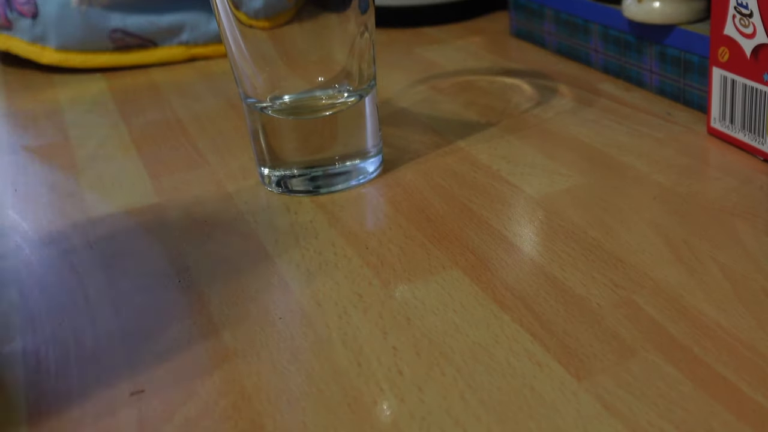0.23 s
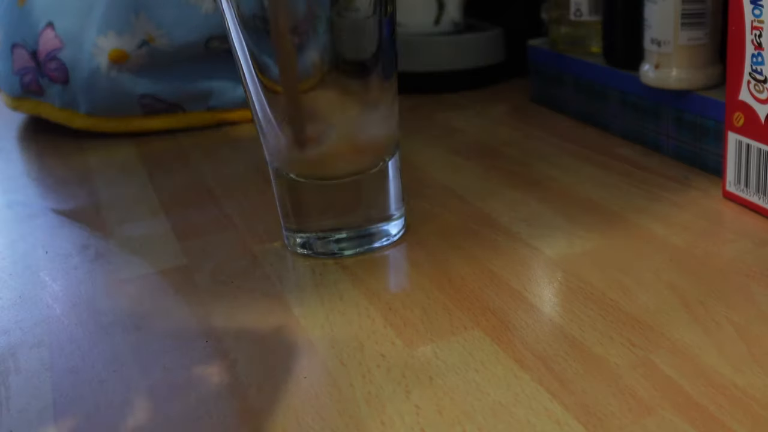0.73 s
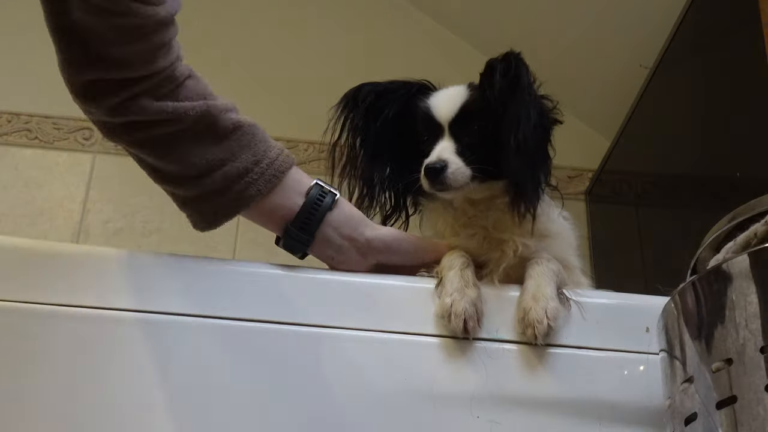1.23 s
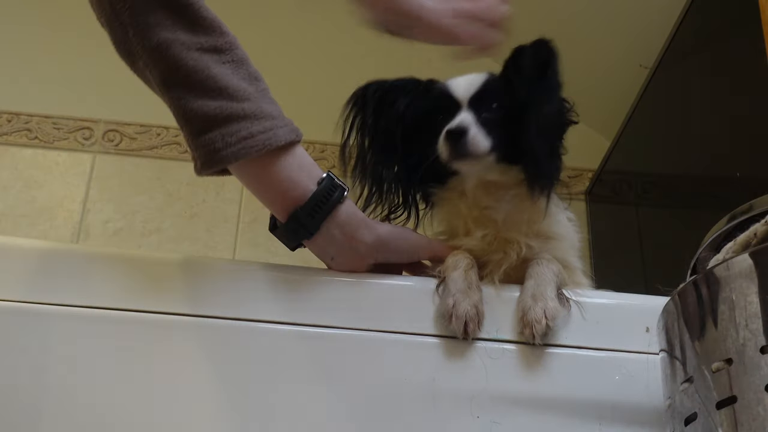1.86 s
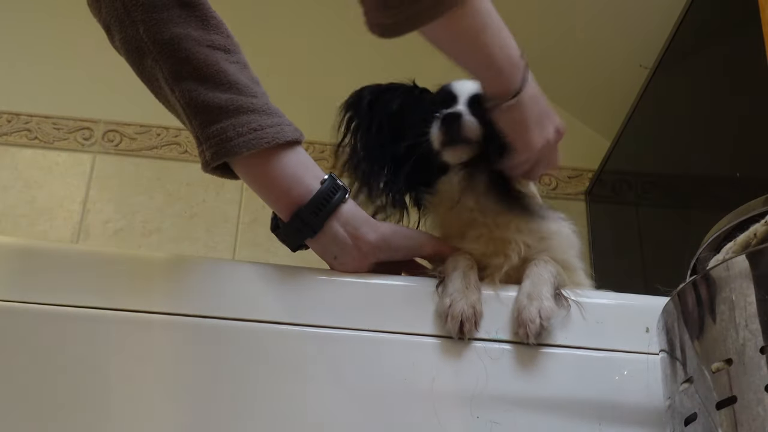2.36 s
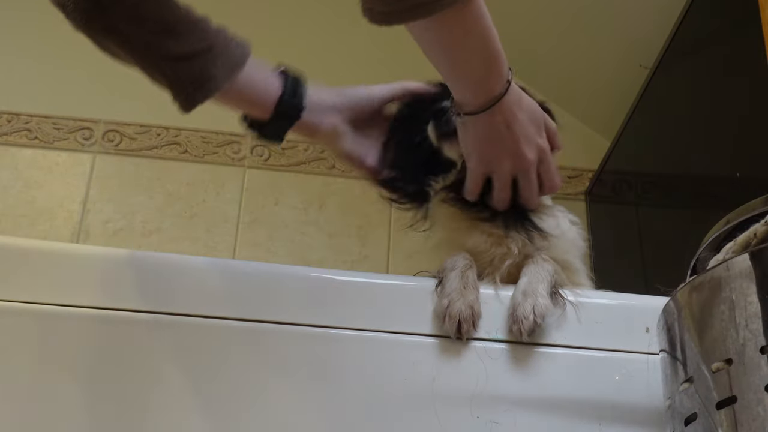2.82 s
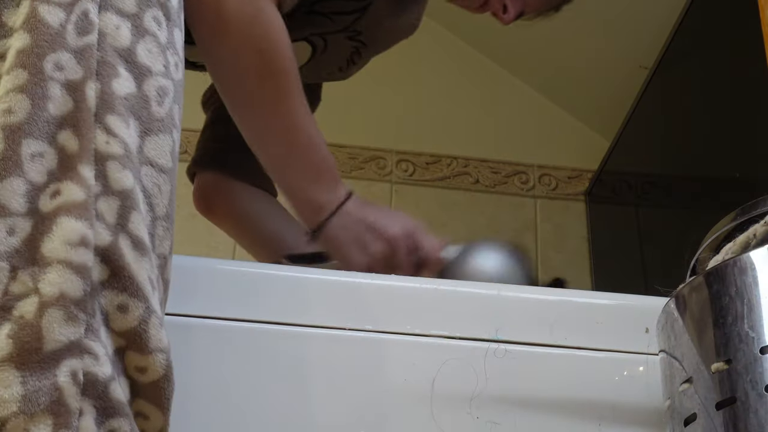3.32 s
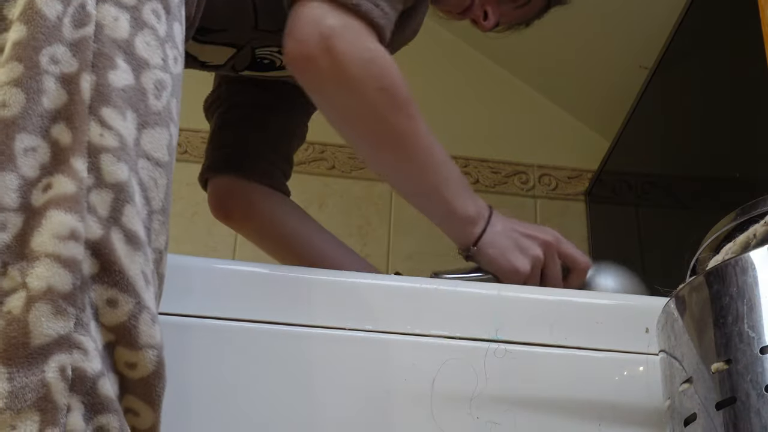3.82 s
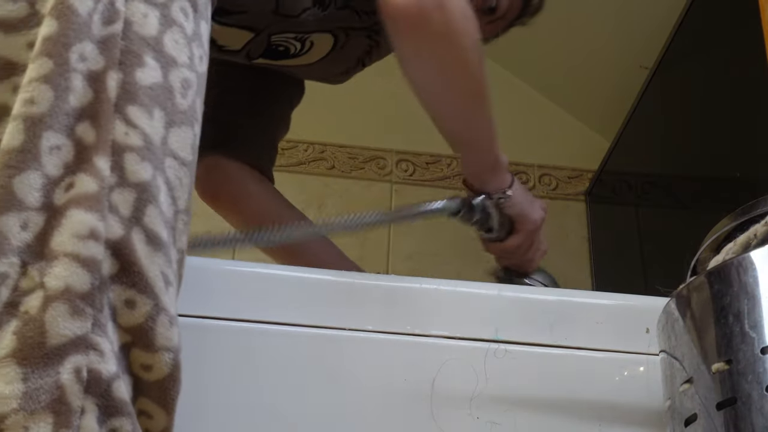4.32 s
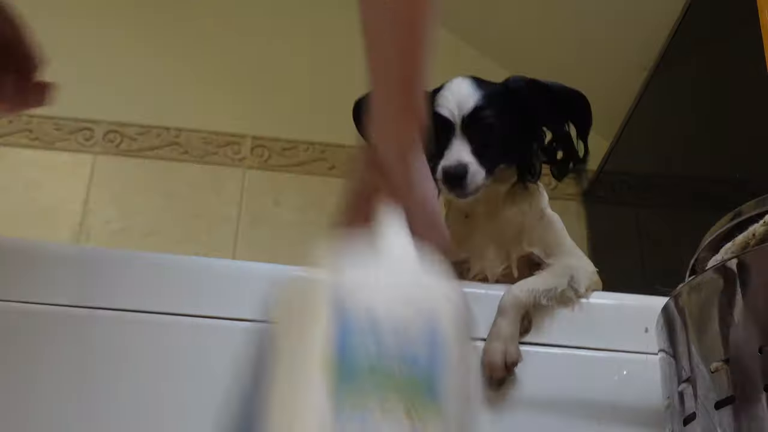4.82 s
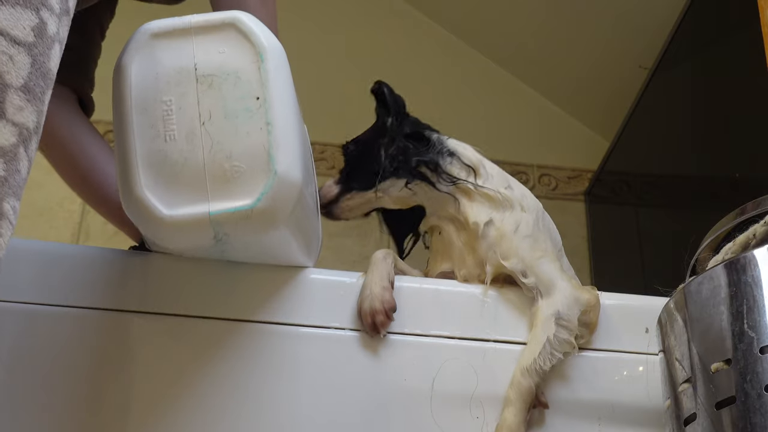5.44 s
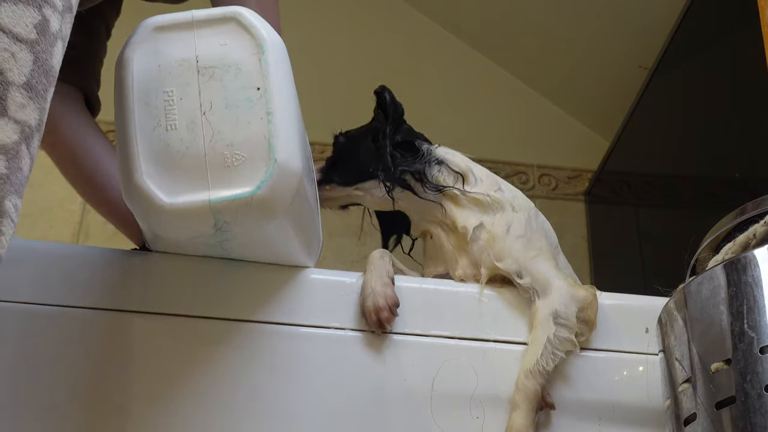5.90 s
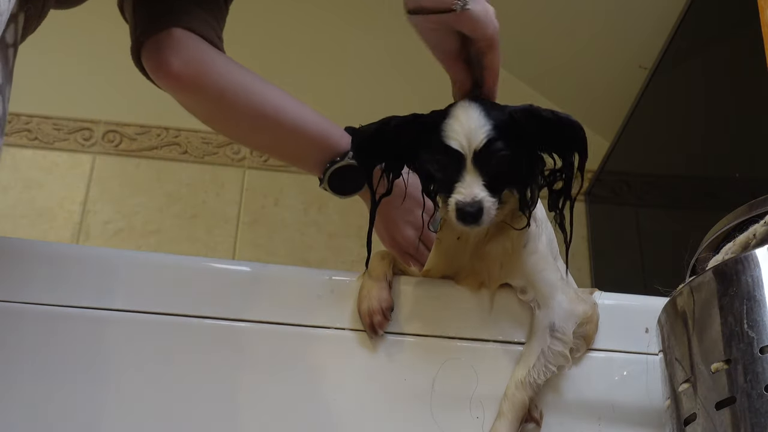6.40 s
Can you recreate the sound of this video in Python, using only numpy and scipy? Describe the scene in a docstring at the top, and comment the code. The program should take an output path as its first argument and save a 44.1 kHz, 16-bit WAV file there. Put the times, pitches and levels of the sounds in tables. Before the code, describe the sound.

In a humming kitchen, a carton is set down on a counter with a clattering knock, and milk briefly splashes into a glass. The sound cuts to a bathroom, where a nearby shower head hisses steadily into a bathtub. The spray turns uneven, with light bumps, splashes and sharp slaps of water on enamel. A heavy jug thuds against the tub, the water stops, and a low hum remains.

```python
"""A shower head sprays into a bathtub: fine jets hiss and the puddle bubbles where they land.
Before it, in a kitchen, a carton knocks down on the counter and milk fizzes and splashes into a glass.
Then the shower runs and sweeps over wet fur; head, hose and a full jug bump the tub, and water slaps
the enamel three times. The spray stops, leaving faint rustles, faint ringing and the bathroom's hum."""
import sys
import numpy as np
from scipy import signal
from scipy.fft import rfft, irfft, next_fast_len
from scipy.io import wavfile
from scipy.ndimage import uniform_filter1d, map_coordinates

SR = 44100
rng = np.random.default_rng(int(sys.argv[2]) if len(sys.argv) > 2 else 0)


def store_pcm(level_fs):
    """Save levels as 16-bit WAV."""
    pcm = np.round(np.clip(level_fs, -1, 1) * 32767).astype(np.int16)
    wavfile.write(sys.argv[1], SR, np.atleast_2d(pcm).T)


N = 294040
TIME = np.arange(N) / SR
CHANGE_S = 3.19  # with a click, the hum and spray change tone abruptly


def amp(db):
    """Turns decibels into a gain."""
    return 10 ** (np.asarray(db) / 20)


def unit(x):
    """Scales x to an average (rms) level of 1."""
    return x / np.sqrt(np.mean(x ** 2) + 1e-20)


def add(out, start_s, x):
    """Mixes x into out from start_s on."""
    part = out[round(start_s * SR):][:len(x)]
    part += x[:len(part)]


def curves(rows):
    """Levels in dB that glide from row to row, silent outside the table."""
    times, *columns = np.transpose(rows)
    return [np.interp(TIME, times, column, left=-150, right=-150) for column in columns]


def steps(rows):
    """Levels in dB that hold from each row's start to its end, silent elsewhere."""
    out = np.full((len(rows[0]) - 2, N), -150.)
    for start_s, end_s, *levels in rows:
        out[:, round(start_s * SR):round(end_s * SR)] = np.array(levels)[:, None]
    return out


def wobble(rate):
    """A smooth curve through `rate` random values a second."""
    return map_coordinates(rng.standard_normal(int(N * rate / SR) + 4), [TIME * rate])


def filtered(x, response):
    """Shapes x with a filter: a function that gives the gain at each frequency."""
    size = next_fast_len(len(x) + SR // 2)
    return irfft(rfft(x, size) * response(np.fft.rfftfreq(size, 1 / SR)), size)[:len(x)]


def colour(points):
    """A filter drawn through (pitch_hz, level_db) points."""
    pitch_hz, level_db = np.transpose(points)
    return lambda f: amp(np.interp(np.log(f + 1), np.log(pitch_hz + 1), level_db))


def body(modes):
    """A filter that rings like an object, at each (pitch_hz, width_hz, level_db)."""
    return lambda f: sum((-1) ** k * amp(db) * 1j * f * width / (hz * hz - f * f + 1j * f * width)
                         for k, (hz, width, db) in enumerate(modes))


def rush(response, patchy_db, grain_db=0):
    """Filtered noise at level 1, with louder and softer patches; grain_db makes it crackle."""
    noise = rng.standard_normal(N + 512) * amp(grain_db * rng.standard_normal(N + 512))
    spectrum = signal.stft(noise, nperseg=512)[2]
    patches = uniform_filter1d(rng.standard_normal(spectrum.shape), size=7, axis=0)
    patches = unit(uniform_filter1d(patches, size=6, axis=1))
    patchy = signal.istft(spectrum * amp(patchy_db * patches), nperseg=512)[1][:N]
    return unit(filtered(patchy, response))


def bubbles(count, hz, spread, cycles):
    """Scattered bubbles at level 1: each is a short tone that rises in pitch as it dies."""
    when, size, pitch = rng.random(count), rng.exponential(size=count), rng.standard_normal(count)
    turns = np.clip(hz * np.exp(spread * pitch), 800, 9000)[:, None] * TIME[:SR // 40]
    age = turns / cycles
    ring = amp(1.6 * size)[:, None] * age * np.exp(-3 * age) * np.sin(2 * np.pi * turns * (1 + .05 * age))
    where = (when * N).astype(int)[:, None] + np.arange(SR // 40)
    return unit(np.bincount(where.ravel(), ring.ravel())[:N])


# How loud the kitchen is: start_s, end_s, hum_db, air_db
KITCHEN_LEVELS = [(0, 0.067, -38, -50), (.07, .73, -38.5, -46.5), (.745, 1.27, -36, -45)]
# Tone of its hum and of its air: pitch_hz, level_db
KITCHEN_HUM = [(15, -43), (25, -12), (102, -4.5), (130, 2), (181, -5.5), (334, -1), (461, -7), (537, -21),
               (700, -34), (1000, -80)]
KITCHEN_AIR = [(620, -13), (850, 0.5), (1800, -4), (2070, -8), (4460, -11.5), (16000, -25.5)]
# Where its air sings faintly: pitch_hz, width_hz, level_db
KITCHEN_RINGS = [(1780, 60, -2), (2400, 60, -6), (2650, 65, -4), (4505, 80, -7), (5380, 70, -6),
                 (9440, 60, -11)]


def kitchen():
    """The kitchen hums low under a faint hiss of air."""
    hum_db, air_db = steps(KITCHEN_LEVELS)
    air = rush(colour(KITCHEN_AIR), patchy_db=1)
    singing = amp(-9 + 2.5 * wobble(8)) * rush(lambda f: body(KITCHEN_RINGS)(f) ** 2, patchy_db=4)
    return amp(hum_db) * rush(colour(KITCHEN_HUM), patchy_db=.6) + amp(air_db) * unit(air + singing)


# The carton touches the counter: start_s, knock_db, tick_db
CARTON_CONTACTS = [(0.4267, 11.5, -21), (0.448, 4, -48), (0.4627, 13, -17), (0.48, -6, -40),
                   (0.497, 2.5, -44), (0.512, 9.5, -24), (0.5406, 14.5, -16.5), (0.56, 12, -26),
                   (.58, 7, -39)]
# How the counter rings: pitch_hz, width_hz, level_db
COUNTER_RINGS = [(73.6, 58, -12), (163, 34, -1), (199, 52, -2.5), (352, 38, 1), (418, 35.6, 4.5),
                 (540, 46, -4), (886, 200, -16)]
# Tone of scraping card: pitch_hz, level_db
CARD_TONE = [(350, -35), (600, -19), (1210, 0), (1930, -12), (3250, -11), (14900, -27.5), (16000, -19)]


def carton():
    """Each contact pushes the counter softly and ticks; the card scrapes as it settles."""
    pushes, ticks, t = np.zeros(N), np.zeros(N), TIME[:SR // 20]
    for start_s, knock_db, tick_db in CARTON_CONTACTS:
        add(pushes, start_s, amp(knock_db) * np.hanning(40))
        tick_shape = amp(tick_db - 60 * np.maximum(t - .0035, 0) / .008)
        add(ticks, start_s, tick_shape * rng.standard_normal(len(t)))
    ticks = filtered(ticks, lambda f: 1j * f / (900 + 1j * f) * 2500 / (2500 + 1j * f))
    before_s, after_s = np.maximum(.466 - TIME, 0), np.maximum(TIME - .584, 0)
    slide = amp(-31 - 260 * before_s - 290 * after_s)  # swells, holds, fades
    rumble = amp(9) * slide * rush(body(COUNTER_RINGS), patchy_db=5)
    scrape = slide * rush(colour(CARD_TONE), patchy_db=1.5, grain_db=3.5)
    echo = amp(-60 * TIME[:SR // 2] / .31) * rng.standard_normal(SR // 2)  # off cupboards and walls
    pushes += amp(-2) * signal.fftconvolve(pushes, echo / np.linalg.norm(echo))[:N]
    return filtered(pushes, body(COUNTER_RINGS)) + ticks + rumble + scrape


# Tone of pouring milk: pitch_hz, level_db
MILK_TONE = [(410, -32), (700, -6), (1200, -11), (4670, -12), (5400, -14), (16000, -35)]


def milk(start_s=.94, end_s=1.27, rise_db_per_s=74):
    """The stream of milk swells and fizzes with small bubbles."""
    level_db = -31.5 - rise_db_per_s * (end_s - TIME) + 1.7 * wobble(59.4)
    stream = amp(level_db) * rush(colour(MILK_TONE), patchy_db=7)
    fizz = amp(-46) * bubbles(count=2500, hz=1072, spread=.133, cycles=28)
    return (TIME > start_s) * (TIME < end_s) * (stream + fizz)


# Splashes of milk, then water: start_s, level_db, pitch_hz, fade_s (time to fall 60 dB)
SPLASHES = [(0.9522, -19, 8000, 0.015), (1.0157, -22.5, 6400, 0.095), (1.0835, -28, 7500, 0.029),
            (1.09, -26, 11900, 0.12), (1.122, -24, 9760, 0.14), (1.164, -25, 5441, 0.3),
            (1.1655, -21, 3620, 0.046), (1.252, -23.5, 3180, 0.069), (3.323, -17.5, 5500, 0.074),
            (3.474, -19.5, 5550, 0.25), (3.722, -17, 12000, 0.12), (3.76, -33, 1643, 0.57),
            (3.836, -16, 7280, 0.05), (3.914, -24, 5400, 0.1), (3.942, -15, 3800, 0.045),
            (3.950, -11, 4200, 0.043), (4.09, -19, 12500, 0.069), (4.125, -28, 900, 0.18),
            (4.13, -29.5, 1540, 0.83), (4.136, -30, 1950, 0.21), (4.186, -23.5, 1060, 0.38),
            (4.198, -23.5, 1370, 0.4), (4.242, -16.5, 2260, 0.15), (3.865, -31.5, 917, .25),
            (4.298, -25.5, 904, 0.27), (4.419, -21, 1260, 0.12), (4.606, -17.5, 10300, 0.16)]


def splashes():
    """Each splash is a burst of noise ringing in the pocket of air that it opens."""
    out, t = np.zeros(N), TIME[:SR // 6]
    for start_s, db, hz, fade_s in SPLASHES:
        # Width as a share of the pitch: long splashes ring purer, high ones noisier.
        width = .38 * (fade_s / .05) ** -.45 * (hz / 2500) ** .3
        shape = amp(-60 * t / fade_s) + .45 * np.exp(-t / .0008)
        burst = shape * rng.standard_normal(len(t))
        burst *= amp(5 * rng.standard_normal(len(t)))  # single droplets stand out
        pocket = body([(hz, width * hz, 0)])
        ring = filtered(burst, lambda f: pocket(f) ** 2 + .1 * width * (1j * f / (hz + 1j * f)) ** 3)
        add(out, start_s, amp(db) * ring / np.max(np.abs(ring)))
    return out


# How loud the bathroom is: start_s, end_s, hum_db, air_db
BATH_LEVELS = [(1.29, 3.19, -39.5, -76), (3.19, 5.19, -37.5, -55.5), (5.19, 5.98, -38.5, -62),
               (5.98, 6.68, -36, -60.5)]
# Tone of its hum before and after the click at CHANGE_S, and of its air: pitch_hz, level_db
EARLY_HUM = [(25, -33), (141, -0.5), (176, -7), (205, 2), (257, -10), (344, -10.5), (430, -19),
             (700, -34.5), (1100, -79)]
LATE_HUM = [(36, -50), (64, -21.5), (100, -11), (141, 1), (176, -11), (224, -2.5), (307, -19), (352, -14.5),
            (600, -41), (850, -85.5)]
BATH_AIR = [(290, -27.5), (480, -8.5), (700, -9.5), (919, -9.5), (2430, -16), (14000, -12), (16000, -11)]
# Where its air sings faintly: pitch_hz, width_hz, level_db
BATH_RINGS = [(1240, 59, -4), (2050, 82, -1.5), (3540, 120, -2.5)]


def bathroom():
    """The bathroom hums quietly under a faint hiss of air."""
    hum_db, air_db = steps(BATH_LEVELS)
    late, early = rush(colour(LATE_HUM), patchy_db=.83), rush(colour(EARLY_HUM), patchy_db=.1)
    hum = np.where(TIME > CHANGE_S, late, early)
    air = rush(lambda f: colour(BATH_AIR)(f) * (1 + 1.8 * abs(body(BATH_RINGS)(f)) ** 2), patchy_db=1)
    return amp(hum_db + .52 * wobble(8.2)) * hum + amp(air_db) * air


# Strength of the spray as the head turns: time_s, jets_db, fine_db (boost of the highest hiss)
SPRAY_LEVELS = [(1.29, -25.5, 0), (3.17, -25, -4), (3.21, -30.5, 4.5), (3.246, -35, 7), (3.265, -27.5, -5),
                (3.305, -35, 1), (3.36, -29, -1.5), (3.46, -28, -1.5), (3.54, -25, -1), (3.71, -29.5, -1),
                (3.79, -32, -4), (3.83, -37, 3), (3.92, -34.5, -3), (4.09, -56, 7), (4.13, -30, -5),
                (4.35, -30.5, -5), (4.58, -37, -4.5), (4.7, -52, 6), (4.95, -70, -38)]
# Tone of the jets and of the puddle where they land: pitch_hz, level_db
JETS_TONE = [(1180, -40.5), (2000, -12.5), (2320, -5), (3230, -1), (9580, -4), (16000, -8)]
PUDDLE_TONE = [(600, -63), (759, -13), (955, -12), (1200, -2.5), (2020, -1.5), (3000, -9.5), (4200, -63)]
# The puddle wells up or drains: middle_s, half_length_s, change_db
GURGLES = [(1.7, 0.016, 3), (1.972, 0.026, 3.5), (2.2, .025, 3.5), (3.84, .09, -3), (4.27, 0.047, 6.5),
           (4.778, 0.046, 10.5)]


def shower(fine_above_hz=7600):
    """Fine jets hiss and the puddle bubbles; the hiss is patchier while the head moves."""
    jets_db, fine_db = curves(SPRAY_LEVELS)
    late = TIME > CHANGE_S
    flutter_db = .704 * wobble(45)
    still = rush(colour(JETS_TONE), patchy_db=1.33)
    moving = rush(colour(JETS_TONE), patchy_db=1.9, grain_db=2.5)
    fine = filtered(moving, lambda f: 1 / (1 + (fine_above_hz / (f + 1)) ** 6))
    jets = amp(jets_db + flutter_db) * np.where(late, moving + (amp(fine_db) - 1) * fine, still)
    gurgle_db = sum(db * np.exp(-((TIME - middle_s) / half_s) ** 2) for middle_s, half_s, db in GURGLES)
    puddle_db = jets_db + np.where(late, -8.5, -6) + gurgle_db
    puddle = rush(colour(PUDDLE_TONE), patchy_db=1.4, grain_db=1)
    puddle += amp(-4) * bubbles(count=5000, hz=2000, spread=.3, cycles=30)
    # Nearer the enamel, a strong stream drums lower.
    drumming = late * amp(1.16 * jets_db + 27) * rush(body([(730, 470, 0)]), patchy_db=.6)
    return jets + amp(puddle_db + flutter_db + .6 * wobble(13)) * (puddle + drumming)


# Head, hose and jug touch the tub, the heavy jug with the dullest thud: start_s, level_db, dull_above_hz
BUMPS = [(3.252, -13.5, 1500), (3.388, -14, 1500), (4.603, 4.5, 200), (4.626, 0, 200)]
# How the tub rings: pitch_hz, width_hz, level_db
TUB_RINGS = [(72, 25, -1.5), (160.4, 17, -1.5), (208.4, 44, -2.5), (257.4, 72, -2), (409, 55, 3.5),
             (500, 99, -3), (908, 290, -8)]


def tub_bumps(push_db=-5):
    """A wet contact pushes the tub once and shakes it for a moment."""
    shake, t = np.zeros(N), TIME[:SR // 2]
    for start_s, db, dull_above_hz in BUMPS:
        force = amp(db - 60 * t / .17) * (1 - np.exp(-t / .002)) * rng.standard_normal(len(t))
        add(force, 0, amp(db + push_db) * np.hanning(110))
        add(shake, start_s, filtered(force, lambda f: 1 / (1 + 1j * f / dull_above_hz) ** 2))
    return filtered(shake, lambda f: body(TUB_RINGS)(f) * (1j * f / (85 + 1j * f)) ** 2)


# Water slaps the enamel: start_s, level_db, hold_s, fade_s, boom_db (compared with the slap)
SLAPS = [(3.949, -19, 0.057, 0.31, -5.5), (4.425, -20, 0.057, 0.38, -9), (4.6, -39, 0.01, 0.19, -25)]
# Tone of a slap: pitch_hz, level_db
SLAP_TONE = [(290, -41), (500, -5.5), (668, -18), (946, -4.5), (1790, -2), (2610, -7), (9490, -9),
             (16000, -14)]


def water_slaps():
    """A sheet of water strikes at once, holds, and dies in the tiled room; the tub booms under it."""
    sheet, boom, t = np.zeros(N), np.zeros(N), TIME[:SR // 2]
    strike = (1 + .348 * np.exp(-t / .034)) * (1 - np.exp(-t / .00053))
    for start_s, db, hold_s, fade_s, boom_db in SLAPS:
        shape = strike * amp(db - 60 * np.maximum(t - hold_s, 0) / fade_s)
        add(sheet, start_s, shape)
        add(boom, start_s, shape * amp(boom_db))
    return sheet * rush(colour(SLAP_TONE), patchy_db=1.5) + boom * rush(body(TUB_RINGS), patchy_db=.5)


# Brief soft rustles and two faint narrow ringing tones: start_s, length_s, level_db, pitch_hz, width_hz
RUSTLES_AND_RINGS = [(5.019, 0.25, -65, 1730, 120), (5.991, 0.95, -74.5, 1260, 60.5),
                     (6.236, 0.1, -63, 1700, 700), (6.363, 0.059, -57.5, 9000, 3000),
                     (6.397, 0.32, -62, 8500, 6000), (6.414, .06, -61, 3580, 800)]


def rustles_and_rings():
    """Bands of noise rise fast and fade: wide ones rustle, narrow ones ring."""
    out = np.zeros(N)
    for start_s, length_s, db, hz, width_hz in RUSTLES_AND_RINGS:
        count = round(length_s * SR)
        shape = np.sin(np.pi * np.linspace(0, 1, count) ** .7)
        noise = unit(filtered(rng.standard_normal(count), body([(hz, width_hz, 0)])))
        add(out, start_s, amp(db) * shape * noise)
    return out


def scene():
    """The kitchen sounds, then the bathroom sounds, the same in both channels."""
    mono = kitchen() + carton() + milk() + splashes()
    mono += bathroom() + shower() + tub_bumps() + water_slaps() + rustles_and_rings()
    return np.array([mono, mono])


# Brief silences: start_s, end_s
SILENCES = [(.058, .072), (.726, .7455), (1.268, 1.2895)]
# Small sharp clicks: start_s, level_db
CLICKS = [(3.185, -34), (5.187, -27.5), (5.98, -24)]


def record(dry, ceiling=.85, top_hz=15850):
    """One microphone near the floor hears it all; the sound cuts out three times and has three clicks."""
    dip = body([(606, 367, -5.5)])  # the housing swallows one band
    mono = filtered(dry[0], lambda f: (1 - dip(f)) * 1j * f / (45 + 1j * f))  # the deepest bass drops too
    for start_s, end_s in SILENCES:
        mono[round(start_s * SR):round(end_s * SR)] = 0
    for start_s, db in CLICKS:
        add(mono, start_s, amp(db) * np.exp(-TIME[:SR // 50] / .00095))
    mono = mono / (1 + abs(mono / ceiling) ** 4) ** .25  # rounds off the loudest knocks
    mono = filtered(mono, lambda f: 1 / (1 + (f / top_hz) ** 300))
    return np.array([mono, mono])


dry = scene()
out = record(dry)
store_pcm(out)
```